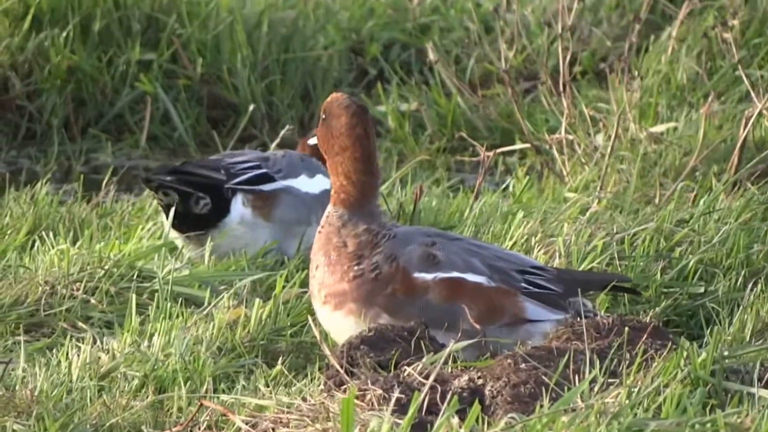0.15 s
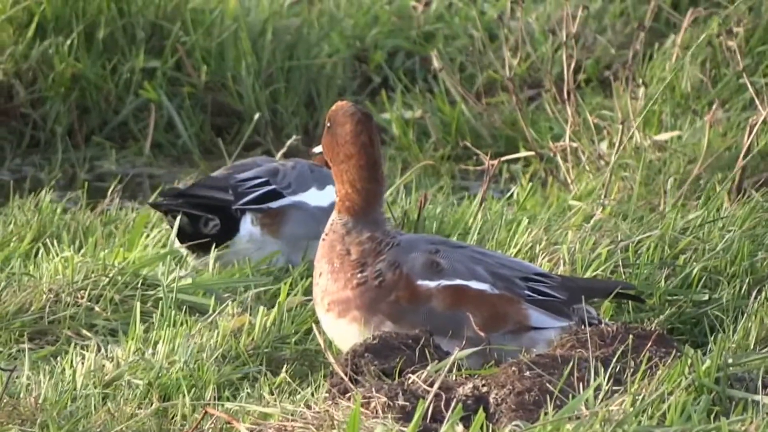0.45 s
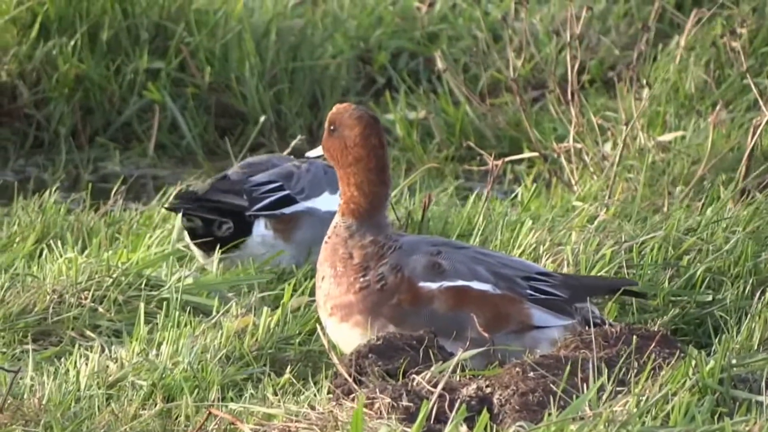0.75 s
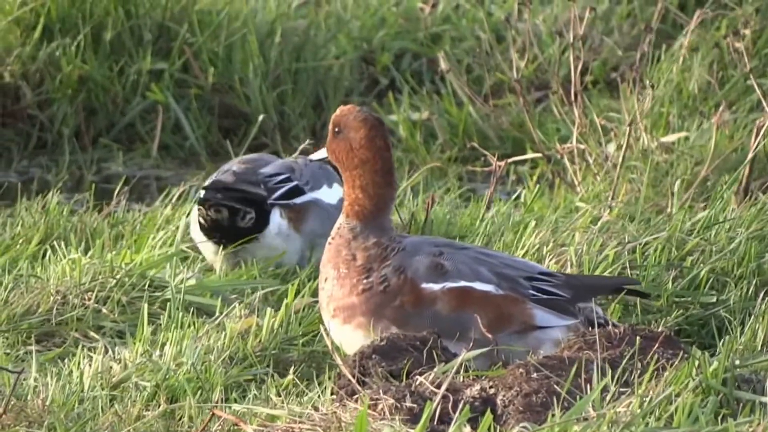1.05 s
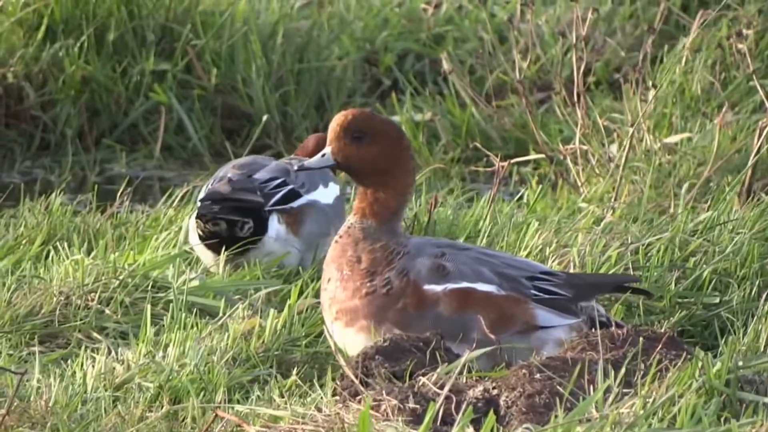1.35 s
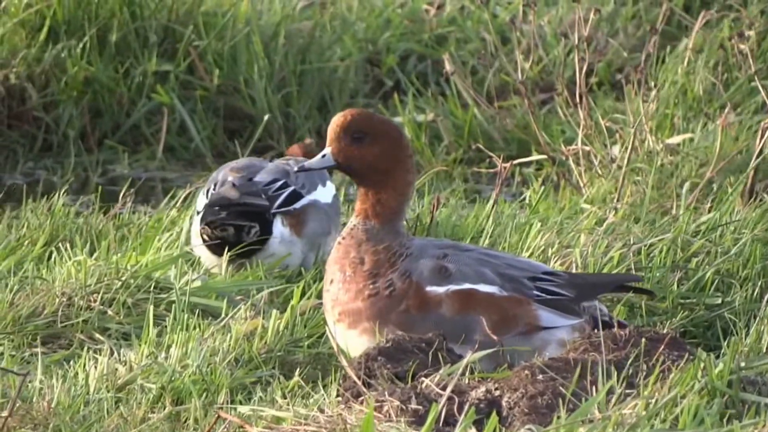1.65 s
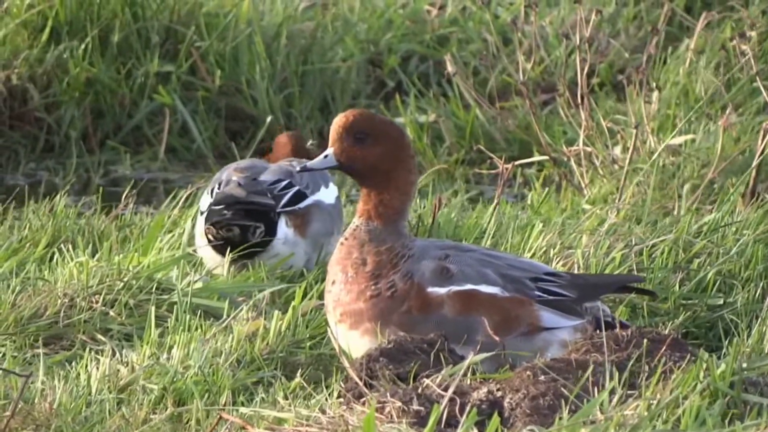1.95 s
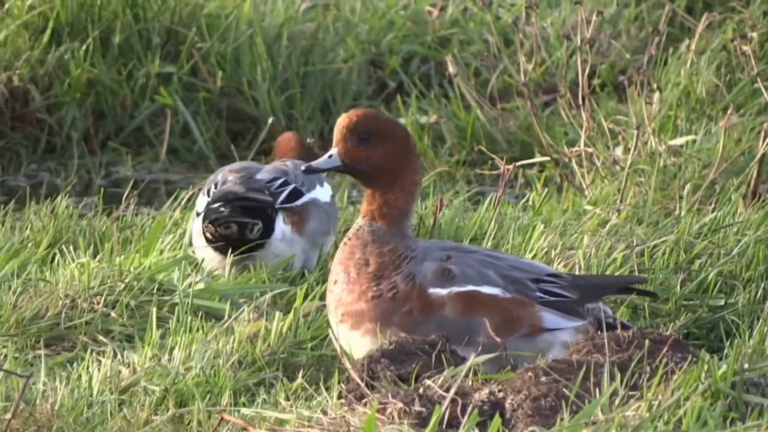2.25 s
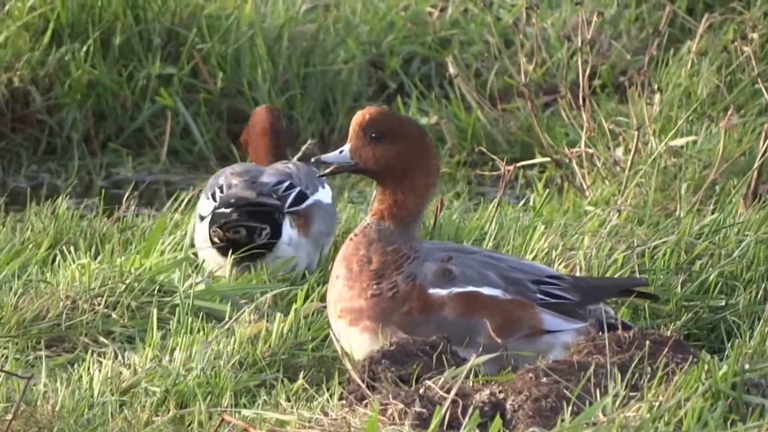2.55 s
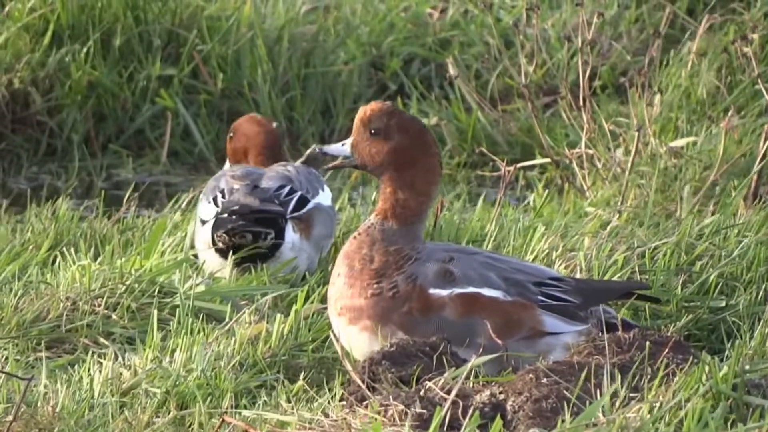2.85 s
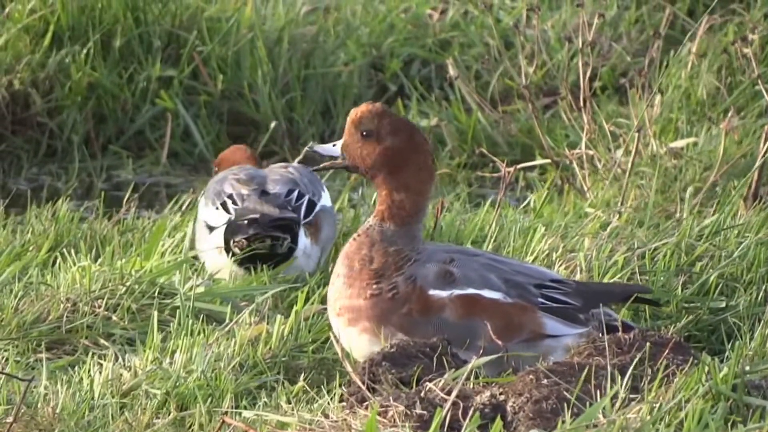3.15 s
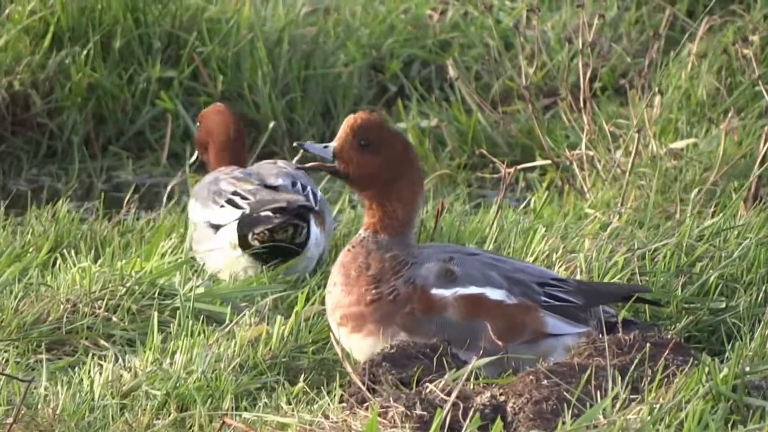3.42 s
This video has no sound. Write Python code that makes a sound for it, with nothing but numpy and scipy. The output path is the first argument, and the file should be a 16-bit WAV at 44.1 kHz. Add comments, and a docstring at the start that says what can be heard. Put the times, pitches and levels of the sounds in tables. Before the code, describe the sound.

A duck gives one short whistle that rises and falls, near the end. Before it, wind rumbles and flutters on the microphone, with faint snaps of grass and tiny hisses as ducks graze on an open bank.

```python
"""Wind gusts buffet the microphone from the start, rumbling and fluttering over a faint, distant
hum and hiss. Ducks graze on a grassy bank: blades tear with tiny dry snaps, and air puffs through
the birds' bills in short hisses. Near the end a drake wigeon gives one arched whistle, stepping up
through weak registers into a loud note and down again, with a faint echo from the far bank."""
import sys
import numpy as np
from scipy import signal
from scipy.fft import rfft, irfft, next_fast_len
from scipy.io import wavfile
from scipy.ndimage import uniform_filter1d, map_coordinates

SR = 44100
rng = np.random.default_rng(int(sys.argv[2]) if len(sys.argv) > 2 else 0)


def waveform_to_disk(signal):
    """Save audio, clipped to [-1, 1], as 16-bit WAV at the path in sys.argv[1]."""
    frames = np.transpose(np.atleast_2d(signal))
    scaled = np.clip(frames, -1, 1) * 32767
    samples = np.round(scaled).astype(np.int16)
    wavfile.write(sys.argv[1], SR, samples)


N = 157878
OVERTONE_ROUGH_DB = 2.5  # flicker of the whistle's overtones, in every register


def amp(db):
    """Decibels to gain."""
    return 10 ** (np.asarray(db) / 20)


def unit(x):
    """Scale to rms 1."""
    return x / np.sqrt(np.mean(x ** 2) + 1e-20)


def along(points, hz):
    """Read (f/Hz, value) points on a log frequency axis."""
    freqs, values = np.transpose(points)
    return np.interp(np.log(hz + 1), np.log(freqs + 1), values)


def clock():
    """Time of each sample in seconds."""
    return np.arange(N) / SR


def curves(rows):
    """One automation curve for each column after the time."""
    times, *columns = np.transpose(rows)
    return [np.interp(clock(), times, column) for column in columns]


def wobble(rate):
    """A smooth random curve with `rate` knots a second."""
    return map_coordinates(rng.standard_normal(N // 8), [clock() * rate], mode="wrap")


def filtered(x, response):
    """Equalise x with a gain given as a function of frequency."""
    size = next_fast_len(N + SR // 4)
    return irfft(rfft(x, size) * response(np.fft.rfftfreq(size, 1 / SR)), size)[..., :N]


def rush(colour, likeness=((1000, .9),)):
    """Coloured stereo noise of rms 1; the likeness of left and right sets its width."""
    def mid_side_gains(hz):
        width = np.arccos(np.clip(along(likeness, hz), -1, 1)) / 2
        return amp(along(colour, hz)) * [np.cos(width), np.sin(width)]
    mid, side = filtered(rng.standard_normal((2, N)), mid_side_gains)
    return unit(np.array([mid + side, mid - side]))


def gate(start, end, edge_s=0.0021):
    """Open between two times, with quick soft edges."""
    t = clock()
    return np.sin(np.pi / 2 * np.clip(np.minimum(t - start, end - t) / edge_s, 0, 1)) ** 2


def phase_of(hz, jitter):
    """Phase of a tone whose pitch wavers by about the fraction `jitter`."""
    return 2 * np.pi * np.cumsum(hz * (1 + jitter * wobble(600))) / SR


def eddy(rate, swell_s=0.0306):
    """Quick turbulent flicker of rms 1, with the slow swells taken out."""
    flicker = wobble(rate)
    return unit(flicker - uniform_filter1d(flicker, int(swell_s * SR)))


def wind():
    """Eddies hit the microphone: a rumble, a flutter above it, and a crackle in the strongest."""
    # gust contours of the two lower layers: t/s, relative level/dB
    rumble_level = [(0.0, -37.5), (0.08, -41), (0.16, -36.5), (0.31, -41.5), (0.43, -38.5), (0.5, -57.5),
                    (0.59, -44), (0.75, -50.5), (0.84, -37.5), (0.9, -38.5), (0.96, -32.5), (1.01, -38.5),
                    (1.26, -34.8), (1.5, -35.8), (1.6, -35.3), (1.71, -37.5), (1.8, -35), (1.92, -40),
                    (2.02, -40), (2.13, -44), (2.19, -41.5), (2.51, -40.5), (2.59, -44.5), (2.74, -39),
                    (2.86, -47), (2.91, -46), (2.94, -55.5), (3.05, -41.3), (3.24, -42), (3.275, -35),
                    (3.31, -39), (3.58, -41)]
    flutter_level = [(0.02, -47.5), (.08, -53.5), (.14, -45.5), (.24, -52), (.33, -52.5), (0.42, -51),
                     (0.5, -66), (.61, -57.5), (.75, -62), (0.8, -58.5), (0.845, -43.5), (0.87, -49),
                     (0.92, -46.5), (0.945, -39), (1.0, -47), (1.17, -50), (1.28, -43.5), (1.35, -46.5),
                     (1.43, -44), (1.475, -47.5), (1.53, -44.5), (1.605, -41), (1.66, -46.5), (1.76, -47),
                     (1.815, -43), (1.91, -51.5), (2.1, -50.5), (2.2, -49), (2.4, -49), (2.51, -50.5),
                     (2.58, -57.5), (2.65, -49.5), (2.69, -55.5), (2.735, -48.5), (2.84, -57),
                     (2.95, -62.5), (3.07, -50.5), (3.19, -48.5), (3.245, -59), (3.28, -49), (3.47, -50),
                     (3.5, -55.5), (3.525, -50), (3.57, -56)]
    # single strong eddies: t/s, flutter lift/dB
    buffets = [(0.023, 5), (0.1, 4.5), (.163, 1.5), (.213, 3.5), (.303, 4), (.347, 6), (.379, 5.5),
               (.422, 3), (.772, 4.5), (.943, 2), (1.089, 4.5), (1.115, 4.5), (1.234, 2.5), (1.39, 2),
               (1.411, 4), (1.43, 3), (1.528, 2), (1.594, 3.5), (1.62, 3.5), (1.69, 3.5), (1.784, 3.5),
               (1.814, 3.5), (1.88, 4), (1.965, 5), (2.008, 3.5), (2.11, 2), (2.174, 6), (2.32, 5.5),
               (2.481, 5.5), (2.522, 4), (2.778, 2.5), (3.385, 5.5), (3.521, 2)]
    # spectra of the three layers: f/Hz, gain/dB
    rumble_colour = [(20, -46), (35, -34), (60, -14.5), (110, -4), (190, 0.14), (300, -1.5), (500, -9),
                     (800, -18.5), (1500, -40), (3000, -77.5)]
    flutter_colour = [(150, -28), (350, -2), (600, 1), (900, -4.5), (1400, -9.5), (2000, -18.5),
                      (2800, -29.5), (4000, -44), (7000, -67)]
    crackle_colour = [(600, -15), (1500, 1.5), (2400, 5.5), (3400, -4), (4400, -14.5), (8000, -48.5)]
    # stereo image: f/Hz, left-right likeness
    likeness = [(40, .94), (90, 0.852), (180, 0.746), (350, 0.21), (700, -0.051), (1400, 0.084),
                (3000, 0.483)]
    buffet_s, strong_gust_db, crackle_growth = 0.00568, -44.5, 1.79
    ceiling_db, knee = -20, 5.7

    eddies = unit(eddy(75) + 0.986 * eddy(190))
    stereo_eddies = unit(eddies + np.array([eddy(220), eddy(220)]))
    lift_db = sum(db * np.exp(-.5 * ((clock() - at) / buffet_s) ** 2) for at, db in buffets)
    rumble_db = curves(rumble_level)[0] + 1.7652 * eddies
    flutter_db = curves(flutter_level)[0] + 3 * stereo_eddies
    crackle_db = strong_gust_db + crackle_growth * (flutter_db - strong_gust_db)
    rumble = amp(rumble_db + .75 * lift_db) * rush(rumble_colour, likeness)
    flutter = amp(flutter_db + lift_db + 3) * rush(flutter_colour, likeness)
    crackle = amp(crackle_db + .6 * lift_db - 18) * rush(crackle_colour, likeness)
    gusts = rumble + flutter + crackle
    return gusts / (1 + np.abs(gusts / amp(ceiling_db)) ** knee) ** (1 / knee)  # soft saturation


def distant_hum():
    """A steady bed of far-off hum and hiss, with a narrow band of noise that drones and fades."""
    # spectra of the bed and the drone: f/Hz, gain/dB
    bed_colour = [(30, -17.5), (100, 3), (300, 0), (600, -4), (900, -4.5), (1250, -6.5), (1600, -15.5),
                  (1900, -16.5), (3200, -22.5), (4200, -18.5), (5800, -25.5), (7500, -22), (9500, -23),
                  (11500, -36), (14500, -33.5), (16000, -44.5)]
    drone_colour = [(1000, -33), (1230, -8), (1315, 1), (1410, -10.5), (1560, -11), (1900, -37.5),
                    (4000, -79.5)]
    # swell of the drone: t/s, level/dB
    drone_level = [(0, -54.5), (.4, -57), (.8, -63), (2.2, -56.5), (2.6, -58.5), (2.95, -71), (3.5, -72.5)]
    # stereo image: f/Hz, left-right likeness
    likeness = [(100, .85), (1300, 0.318), (3000, 0.99), (8000, 0.654), (13000, 0.97)]
    bed = amp(-57) * rush(bed_colour, likeness)
    drone = amp(curves(drone_level)[0]) * rush(drone_colour, likeness)
    return bed + drone


def grass():
    """Plucked blades snap and their torn fibres fizz; tugged grass rustles, and two small ticks ring."""
    # breaking blades: t/s, relative level/dB
    snaps = [(0.0748, -53), (0.0815, -54), (.8208, -44), (.8228, -44), (1.0396, -47), (1.1051, -48),
             (1.392, -47), (1.5592, -45), (1.581, -50.5), (1.6475, -54), (1.861, -53), (2.3585, -50.5),
             (2.3649, -42), (2.373, -46), (2.3898, -40), (2.4168, -49), (2.426, -43), (2.8882, -49),
             (2.8931, -37.5), (3.3092, -48)]
    # tugs at the grass: start/s, length/s, relative level/dB
    rustles = [(.088, 0.0265, -60), (.53, .04, -70), (1.67, .05, -68), (2.351, 0.08, -70)]
    # bright spectrum of snaps and rustles: f/Hz, gain/dB
    snap_colour = [(3000, -40), (6000, -22.5), (7600, 4), (10000, 1), (12000, -12.5), (15000, -12.5)]
    # pitched ticks: t/s, f/Hz, level/dB, t60/s, roughness/rad
    ticks = [(0.124, 7010, -38.5, 0.011, .3), (2.6545, 3700, -47, 0.016, 1.2)]
    snap_gain_db, fizz_db, fizz_t60_s, rustle_rough_db = 11.5, -22, 0.006, 3

    t, cracks, fizz = clock(), np.zeros(N), np.zeros(N)
    for start, db in snaps:
        strength = amp(db + snap_gain_db)
        cracks[round(start * SR)] = strength
        fizz += (t >= start) * strength * amp(fizz_db - 60 * np.abs(t - start) / fizz_t60_s)
    for start, length, db in rustles:
        fizz += gate(start, start + length) * amp(db + rustle_rough_db * wobble(900))
    out = filtered(cracks + fizz * rng.standard_normal(N), lambda hz: amp(along(snap_colour, hz)))
    for start, hz, db, t60, roughness in ticks:
        age = np.maximum(t - start, 0)
        envelope = amp(db - 60 * age / t60) * (1 - np.exp(-age / 0.0003))
        out += envelope * np.sin(2 * np.pi * hz * age + roughness * wobble(3500))
    return out


def bill_hiss():
    """Air sputters through the resonances of the bill: short puffs, then a breath under the whistle."""
    # puffs: start/s, rise/s, hold/s, t60/s, level/dB
    puffs = [(.161, 0.0186, .001, 0.0246, -50.5), (0.201, 0.0049, .013, 0.0025, -53.5),
             (.82, .0006, 0.00306, .045, -50.5), (.832, 0.00195, 0.0088, 0.0666, -58.5),
             (1.558, 0.00071, .001, 0.12, -52), (2.1355, .002, .021, .04, -55)]
    # breath under the whistle: t/s, level/dB
    breath_level = [(3.164, -93.5), (3.167, -47.5), (3.176, -56.5), (3.20, -60), (3.25, -62.5), (3.29, -62),
                    (3.31, -60.5), (3.35, -64), (3.42, -67.5), (3.53, -73)]
    # bill resonances for the puffs and the breath: f/Hz, gain/dB
    puff_colour = [(1200, -15.5), (2250, 3), (2900, -4), (3900, 2.5), (4500, -7), (5700, -7.5), (7300, 2),
                   (8600, -5), (9700, -1), (11400, -19), (14300, -16), (16000, -20.5)]
    breath_colour = [(1200, -15), (2200, -1.5), (3000, -1.5), (3750, 9.5), (4600, -11.5), (6200, -5),
                     (7300, -2.5), (8200, -8), (9900, -4.5), (11300, -25.5), (14500, -23.5), (16000, -32)]
    sputter_db = 2.5

    t, puff_envelope = clock(), np.zeros(N)
    for start, rise, hold, t60, db in puffs:
        attack = np.clip((t - start) / rise, 0, 1)
        puff_envelope += attack * amp(db - 60 * np.maximum(t - start - rise - hold, 0) / t60)
    breath_envelope = amp(curves(breath_level)[0]) * gate(breath_level[0][0], breath_level[-1][0])
    air = breath_envelope * rush(breath_colour) + puff_envelope * rush(puff_colour)
    return air * unit(amp(sputter_db * wobble(600)))


def whistle_glides():
    """As pressure builds and fades, the whistle steps through weaker, rougher registers."""
    # registers: start/s, length/s, first f/Hz, middle f/Hz, last f/Hz, level/dB, level change/dB
    glides = [(3.159, 0.008, 3000, 3150, 3350, -55, 6), (3.167, 0.006, 3850, 3920, 4200, -51, -4),
              (3.170, 0.0231, 1972, 2633, 2785, -48.5, 6.5), (3.292, .052, 2865, 2608, 2450, -48, -1.5),
              (3.342, 0.0427, 2255, 2040, 1965, -56.5, -9), (3.344, 0.0193, 4282, 4270, 4090, -62.5, 8.5),
              (3.360, 0.0207, 4080, 3959, 3874, -48, 1), (3.378, 0.0217, 3800, 3703, 3637, -52.5, -4),
              (3.395, 0.0196, 3530, 3000, 2910, -64, -7), (3.419, 0.036, 2700, 2570, 2440, -67, -3.5)]
    # throat colour on the overtones: f/Hz, gain/dB
    throat = [(4000, -13), (5300, -19), (6300, -23), (7400, -14.5), (8500, -28), (9800, -15),
              (11000, -30.5), (13000, -49.5)]
    fall_db_per_harmonic, shimmer_db = 3, 1

    out = np.zeros(N)
    roughness = amp(OVERTONE_ROUGH_DB * wobble(700))
    for start, length, first, middle, last, db, change_db in glides:
        position = np.clip(2 * (clock() - start) / length - 1, -1, 1)  # -1 to 1 across the glide
        hz = middle + position * (last - first) / 2 + position ** 2 * ((first + last) / 2 - middle)
        phase = phase_of(hz, jitter=.009)
        overtones = sum(amp(along(throat, k * hz) - fall_db_per_harmonic * (k - 1)) * np.sin(k * phase)
                        for k in range(2, 5))
        envelope = amp(db + change_db * position / 2) * gate(start, start + length)
        out += envelope * (np.sin(phase) + roughness * overtones)
    return np.sqrt(2) * out * amp(shimmer_db * wobble(400))


def whistle_arch():
    """The loud note of the whistle: a strong, slightly airy fundamental under rough, raspy overtones."""
    # the arch: t/s, f/Hz, fundamental level/dB, second harmonic level/dB, third harmonic level/dB
    note = [(3.193, 3282, -34.5, -59, -65.5), (3.209, 3436, -34, -57, -73.5),
            (3.222, 3477, -33, -62.5, -76.5), (3.24, 3490, -33.5, -66, -77),
            (3.263, 3408, -35.5, -54.5, -74.5), (3.281, 3338, -35.5, -58, -61.5),
            (3.289, 3285, -38, -60.5, -68), (3.295, 3070, -49.5, -63.5, -74)]
    shimmer_db, air_db, rasp_db = 0.58, -29, -10

    def halo(phase, rate):
        """A narrow band of noise clinging to one partial."""
        return wobble(rate) * np.sin(phase) + wobble(rate) * np.cos(phase)

    hz, fundamental_db, *overtone_dbs = curves(note)
    phase = phase_of(hz, jitter=0.00295)
    tone = amp(fundamental_db + shimmer_db * wobble(270)) * np.sin(phase)
    tone += amp(fundamental_db + air_db) * halo(phase, 900)
    for k, db in enumerate(overtone_dbs, 2):
        tone += amp(db + OVERTONE_ROUGH_DB * wobble(700)) * np.sin(k * phase + .35 * wobble(900))
        tone += amp(db + rasp_db) * halo(k * phase, 1400)
    return np.sqrt(2) * tone * gate(note[0][0], note[-1][0])


def open_field(x):
    """Open ground adds a faint scattered tail and one echo from the far bank."""
    tail_db, tail_t60_s = -21.5, 1.0
    echo_db, echo_delay_s = -27, .058
    t = np.arange(SR // 2) / SR
    tail = rng.standard_normal((2, len(t))) * amp(-60 * t / tail_t60_s)
    scatter = signal.fftconvolve(x[None], tail / np.linalg.norm(tail[0]), axes=1)[:, :N]
    echo = np.interp(clock() - echo_delay_s, clock(), x)
    return x + amp(tail_db) * scatter + amp(echo_db) * echo


def scene():
    """Ducks straight ahead, wind and distance all around."""
    return distant_hum() + open_field(whistle_arch() + whistle_glides()) + bill_hiss() + grass() + wind()


def record(dry):
    """A brick-wall low-pass trims the very top of the treble."""
    top_hz = 15700
    return filtered(dry, lambda hz: hz < top_hz)


dry = scene()
out = record(dry)
waveform_to_disk(out)
```